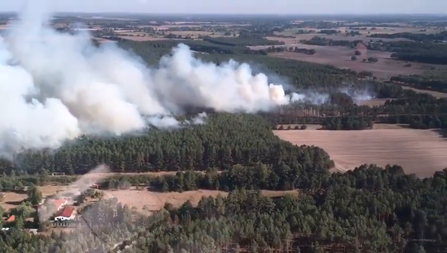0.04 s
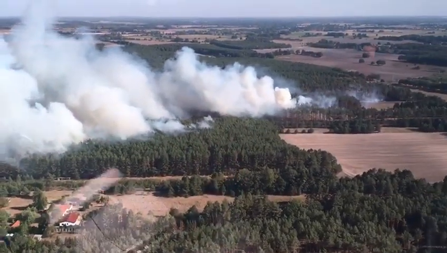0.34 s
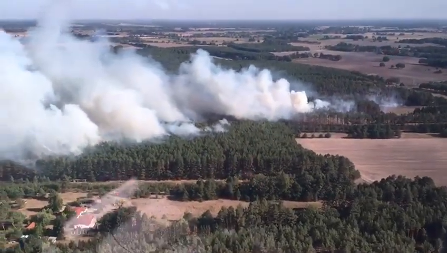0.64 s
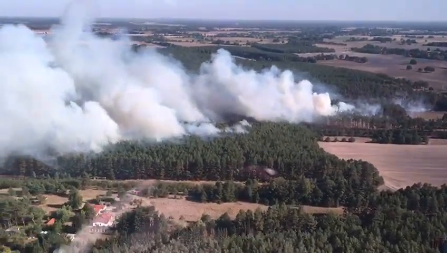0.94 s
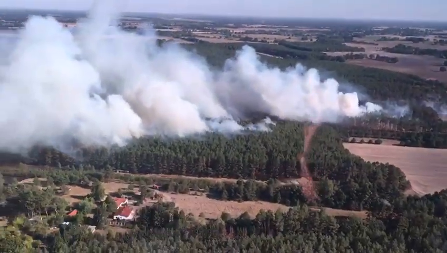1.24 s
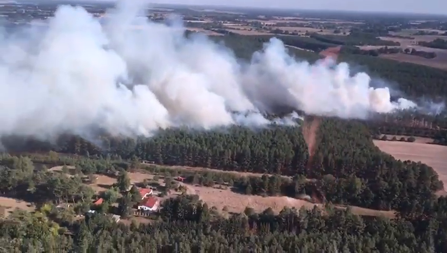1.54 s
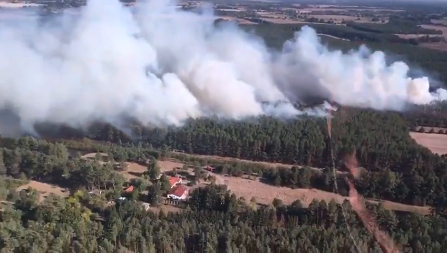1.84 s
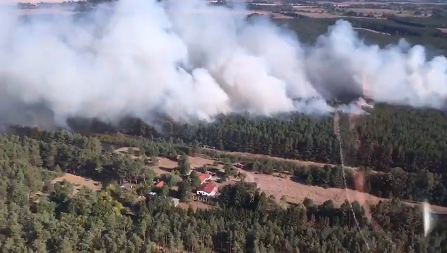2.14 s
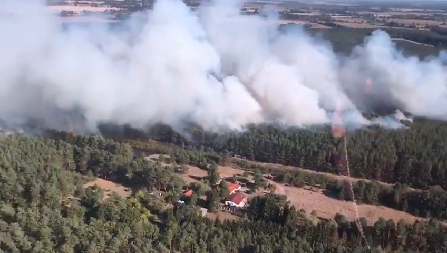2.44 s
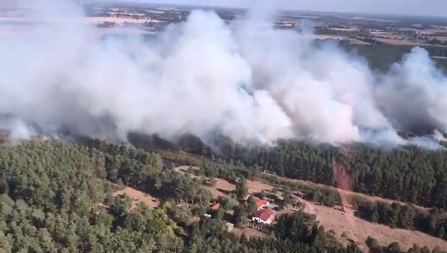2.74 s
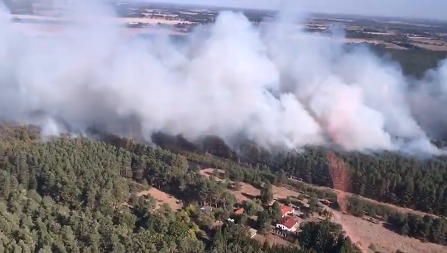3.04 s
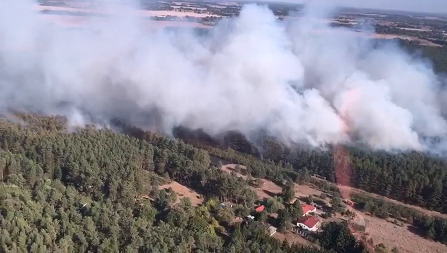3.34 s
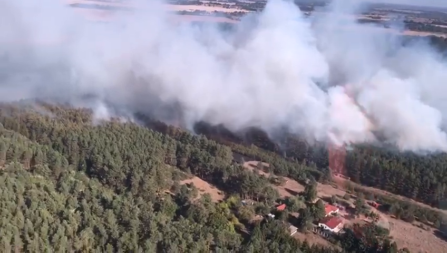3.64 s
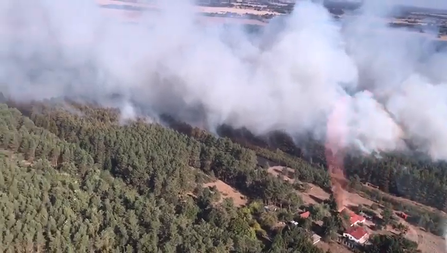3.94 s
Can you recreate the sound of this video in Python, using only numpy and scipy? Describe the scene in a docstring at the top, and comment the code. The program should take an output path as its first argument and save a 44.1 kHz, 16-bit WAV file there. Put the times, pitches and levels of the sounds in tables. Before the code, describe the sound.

A helicopter in steady flight, heard from inside, with throbbing rotor and whining gears.

```python
"""Inside the cabin of a helicopter in steady flight.
The main rotor throbs 26 times a second, one pulse for each passing blade, and its overtones
swell and fade. Meshing gear teeth whine, and a turbine whistles high up and rises a little.
Behind them, air buffets the cabin with a low rumble and rushes along the hull."""
import sys
import numpy as np
from scipy import signal
from scipy.fft import rfft, irfft
from scipy.io import wavfile

SR = 44100
rng = np.random.default_rng(int(sys.argv[2]) if len(sys.argv) > 2 else 0)


def transcribe(signal):
    """Save signal, clipped to [-1, 1], as a 16-bit WAV file at the path in sys.argv[1]."""
    frames = np.atleast_2d(signal).T
    limited = np.clip(frames, -1, 1)
    pcm = np.round(limited * 32767).astype(np.int16)
    wavfile.write(sys.argv[1], SR, pcm)


N = 176400
TIME = np.arange(N) / SR
BLADES, BLADE_PASS_HZ, FIRST_BLADE_S = 4, 25.94, .021

# Strong rotor overtones, at 2, 3, 4 and 6 times the blade rate: t/s, level/dB
ROTOR_2_LEVEL = [(0, -27), (.42, -20.5), (.63, -40), (.85, -18), (1, -25.5), (1.5, -27.5), (2.1, -22.5),
                 (2.35, -19), (2.65, -16), (2.88, -41), (3.05, -18.5), (3.6, -29), (4, -17)]
ROTOR_3_LEVEL = [(0, -17), (.3, -16), (.43, -21.5), (.55, -14.5), (.95, -17.5), (1.351, -18.5),
                 (1.65, -15.5), (2.45, -24), (2.6, -23.5), (3.1, -19.5), (3.6, -23), (4, -27.5)]
ROTOR_4_LEVEL = [(0, -27), (.2, -28), (.3, -18), (.42, -11), (.53, -19), (0.628, -44), (.75, -14),
                 (.88, -14), (1.2, -20), (1.34, -41), (1.46, -15), (1.6, -15.5), (2.25, -22.5), (2.42, -24),
                 (2.68, -14.5), (3.6, -18), (4, -13.5)]
ROTOR_6_LEVEL = [(0, -27.5), (1, -25), (1.1, -40), (1.35, -32.5), (1.5, -23.5), (1.97, -19), (2.05, -40),
                 (2.23, -24.5), (2.33, -37.5), (2.44, -24.5), (2.6, -23), (2.73, -29.5), (3.03, -22.5),
                 (3.27, -28), (3.47, -24), (3.7, -21), (3.8, -27), (4, -18.5)]
# Weaker rotor tones: multiple of the blade rate, level/dB, random swing/dB
WEAK_ROTOR_TONES = [(1, -28.5, 0), (5, -28.5, -0.5), (7, -32, 2), (8, -34.5, 1.5), (9, -36.5, 2.5),
                    (10, -43, 4.5), (11, -47.5, -1), (14, -47.5, 2.5), (16, -56, -3.5), (19, -47, 0.5)]

# Pitch of the main gear whine, made by teeth meshing: t/s, f/Hz
MESH_PITCH = [(0, 1930), (.6, 1930), (1.4, 1917), (2.2, 1918), (2.8, 1925), (4, 1920)]
# Loudness of that whine: t/s, level/dB
MESH_LEVEL = [(0, -30.5), (.035, -48), (.075, -28.5), (.19, -36.5), (.27, -28.5), (.345, -36), (.435, -29),
              (.5, -35.5), (.58, -28), (.64, -34.5), (.68, -44), (.715, -28.5), (.76, -37), (.9, -30.5),
              (.98, -37.5), (1.08, -32.5), (1.2, -33), (1.53, -32), (1.95, -41.5), (2.1, -33),
              (2.35, -35.5), (2.7, -44.5), (3.2, -40.5), (3.6, -36.5), (4, -37.5)]
# Rough noise around that whine, relative to it: t/s, level/dB
MESH_ROUGHNESS = [(0, -5), (.7, -5), (1.1, -11), (1.6, -12), (2.3, -8), (2.8, 0), (3.4, -2), (4, -5)]
# The tone an octave above that whine: t/s, level/dB
OCTAVE_LEVEL = [(0, -52), (.4, -51.5), (1.2, -55), (1.8, -59), (2.4, -55), (3.2, -48.5), (4, -61)]
# Other strong gear tones: f/Hz, then rows of t/s, level/dB
GEAR_TONES = [(661, [(0, -45), (.5, -45), (1.1, -44), (1.6, -55), (3.3, -50), (3.75, -40), (4, -48)]),
              (758, [(0, -36.5), (.9, -37.5), (1.4, -45), (2, -68), (4, -61)]), (1518, [(0, -41.5),
              (.75, -42.5), (1.05, -54), (4, -48)]), (1651, [(0, -43), (1.5, -47), (2.2, -49), (4, -44)]),
              (2273, [(0, -42), (.7, -53), (1.2, -57), (4, -55)]), (2569, [(0, -41.5), (.9, -42.5),
              (1.1, -46.5), (1.35, -57), (2.15, -59), (2.5, -45.5), (4, -43)])]
# Weak gear and tail rotor tones: f/Hz, starting level/dB, final level/dB
WEAK_TONES = [(824, -49, -46), (948, -49, -51), (970, -51, -54), (1050, -51, -46), (1260, -51, -58),
              (1322, -50, -55), (1625, -52, -54), (2474, -55, -54), (3027, -59, -58)]

# Pitch of the whistle from the turbine's compressor: t/s, f/Hz
WHISTLE_PITCH = [(0, 9885), (.7, 9925), (1.25, 9965), (1.55, 10025), (1.8, 10090), (2.35, 10150),
                 (3.5, 10160), (4, 10215)]
# Loudness of that whistle: t/s, level/dB
WHISTLE_LEVEL = [(0, -44.5), (.5, -45.5), (.72, -42), (.87, -46.5), (1.3, -51), (1.58, -41), (1.73, -50),
                 (1.9, -44.5), (2.15, -53), (2.42, -44.5), (2.6, -44), (2.8, -51), (3.25, -44), (4, -45)]
# Tone colour of the turbine's hiss: f/Hz, relative level/dB
HISS_COLOUR = [(2500, -6.5), (4300, 1.5), (4650, 0), (4950, -4.5), (5500, 4.5), (5950, 3.5), (6600, 1),
               (7600, -0.5), (8600, 3), (9500, 4.5), (10250, 2.5), (10420, -1), (11700, -13)]
# Loudness of the hiss: t/s, level/dB
HISS_LEVEL = [(0, -42), (.45, -40.5), (1.2, -44.5), (1.8, -44), (2.6, -40), (4, -42)]
# Breathy turbine whines: f/Hz, width/Hz, level/dB relative to the hiss
TURBINE_WHINES = [(3155, 50, -20), (3770, 70, -20), (5762, 20, -19), (5840, 60, -14.5), (6125, 90, -14.5),
                  (6575, 70, -21)]

# Tone colour of the air buffeting the cabin: f/Hz, relative level/dB
RUMBLE_COLOUR = [(12, -24), (26, -25), (39, -7), (58, -3.5), (90, -0.5), (125, -2), (175, -1.5),
                 (225, -7.5), (290, -15), (420, -24), (800, -44)]
# Loudness of the buffeting: t/s, level/dB
RUMBLE_LEVEL = [(0, -23), (.45, -17.5), (.9, -19), (1.3, -24.5), (1.9, -21.5), (2.3, -21.5), (2.8, -23.5),
                (3.3, -23.5), (4, -21)]
# Tone colour of the rush of air and machinery: f/Hz, relative level/dB
RUSH_COLOUR = [(150, -0.5), (330, 3), (440, -1.5), (540, -.5), (690, -5.5), (830, -1), (1020, -11.5),
               (1130, -6.5), (1280, -5), (1460, -8.5), (1750, -7), (2020, -3), (2170, -8), (2550, -7),
               (2830, -13), (3400, -15), (3800, -18.5), (4100, -21), (5000, -25.5)]
# Loudness of the rush: t/s, level/dB
RUSH_LEVEL = [(0, -27.5), (.25, -28.5), (.45, -29), (.7, -30), (1.1, -30.5), (2, -29.5), (2.6, -28.5),
              (3.1, -29), (3.6, -28), (4, -27.5)]
# Tone colour of an early, mid-pitched swell in the rush: f/Hz, relative level/dB
SWELL_COLOUR = [(230, 2.5), (400, 0), (570, 2), (700, -6), (960, 0), (1100, -5), (1350, -6.5), (1750, -11),
                (2300, -17.5), (2780, -4.5), (3100, -17.5)]
# Loudness of the swell: t/s, level/dB
SWELL_LEVEL = [(0, -36), (.15, -31), (.3, -33), (.38, -25.5), (.47, -32.5), (.7, -33), (1.1, -41),
               (1.6, -48), (4, -58)]


def rotor():
    """Each blade sends a suction pulse; rough air shakes its overtones out of step, high ones most."""
    strong = (2, ROTOR_2_LEVEL), (3, ROTOR_3_LEVEL), (4, ROTOR_4_LEVEL), (6, ROTOR_6_LEVEL)
    gains = [(multiple, gain_curve(rows)) for multiple, rows in strong]
    gains += [(multiple, from_db(db + swing * drift(2.9))) for multiple, db, swing in WEAK_ROTOR_TONES]
    pulses = np.zeros(N)
    for multiple, gain in gains:
        angle = blade_angle() + .19 * drift(rate_hz=.7)
        pulses -= gain * np.cos(multiple * angle)  # minus, because suction lowers the pressure
    return np.sqrt(2) * pulses


def gearbox():
    """Meshing teeth make a rough whine and its octave, among other wavering tones."""
    jitter_hz, swing_db = 2, 2
    hz = curve(MESH_PITCH) + jitter_hz * drift(2.93)
    mesh = tone(hz) * from_db(.5 * drift(22))
    mesh += gain_curve(MESH_ROUGHNESS) * noise_band(hz, width_hz=85)
    octave = tone(2 * hz) + from_db(1) * noise_band(2 * hz, width_hz=110)
    levels = [(pitch_hz, curve(rows)) for pitch_hz, rows in GEAR_TONES]
    levels += [(pitch_hz, np.linspace(start_db, end_db, N)) for pitch_hz, start_db, end_db in WEAK_TONES]
    others = sum(from_db(db + swing_db * drift(12)) * tone(pitch_hz + jitter_hz * drift(5.6))
                 for pitch_hz, db in levels)
    others *= 1 + .22 * drift(14)  # a fine shake that these tones share
    return gain_curve(MESH_LEVEL) * mesh + gain_curve(OCTAVE_LEVEL) * octave + others


def turbine():
    """The compressor's rough whistle climbs in a band of noise, over broad hiss and breathy whines."""
    hz = curve(WHISTLE_PITCH)
    whistle = gain_curve(WHISTLE_LEVEL) * noise_band(hz, width_hz=51)
    breath = from_db(-49) * noise_band(hz, width_hz=280, order=4)
    whines = sum(from_db(db) * noise_band(np.full(N, pitch_hz), width_hz)
                 for pitch_hz, width_hz, db in TURBINE_WHINES)
    return whistle + breath + gain_curve(HISS_LEVEL) * (noise(HISS_COLOUR) + whines)


def buffeting():
    """Air buffets the cabin, making a low rumble that pulses with the blades."""
    return gain_curve(RUMBLE_LEVEL) * throb(depth=.16) * noise(RUMBLE_COLOUR)


def air_rush():
    """Air rushes along the hull, swelling early on and pulsing gently with the blades."""
    rush = gain_curve(RUSH_LEVEL) * noise(RUSH_COLOUR)
    swell = gain_curve(SWELL_LEVEL) * noise(SWELL_COLOUR)
    flicker = from_db(.5 * drift(8.3))
    sway = 1 + .012 * np.cos(blade_angle() / BLADES)  # once for each full turn of the rotor
    return (rush + swell) * flicker * throb(depth=.038) * sway


def blade_angle():
    """An angle in radians that goes round once with each passing blade."""
    return 2 * np.pi * BLADE_PASS_HZ * (TIME - FIRST_BLADE_S)


def throb(depth):
    """A gain that rises and falls with each passing blade."""
    return 1 + depth * np.cos(blade_angle())


def from_db(db):
    """Turn decibels into a gain, the number a sound is multiplied by."""
    return 10 ** (np.asarray(db) / 20)


def rms_one(x):
    """Scale a signal so that its average strength (rms) is 1."""
    return x / np.sqrt(np.mean(x ** 2) + 1e-20)


def curve(rows):
    """Join (time, value) points with straight lines, giving a value for every sample."""
    return np.interp(TIME, *np.transpose(rows))


def gain_curve(rows):
    """Turn (time, decibels) points into a gain for every sample."""
    return from_db(curve(rows))


def drift(rate_hz):
    """A smooth random wobble around 0, about 1 in size; a higher rate wobbles faster."""
    step, warm_up = 40, 2000  # one random value every 40 samples; the first 2000 let the filter settle
    pole = np.exp(-2 * np.pi * rate_hz * step / SR)
    draws = rng.standard_normal(N // step + warm_up + 2)
    slow = signal.lfilter([1], [1, -2 * pole, pole * pole], draws)[warm_up:]
    return np.interp(np.arange(N) / step, np.arange(len(slow)), rms_one(slow - slow.mean()))


def tone(hz):
    """A pure tone of strength 1 that follows a moving pitch."""
    return np.sqrt(2) * np.sin(2 * np.pi * (np.cumsum(hz) / SR + rng.random()))


def noise_band(hz, width_hz, order=2):
    """A narrow band of noise around a moving pitch, like a breathy whistle."""
    lowpass = signal.butter(order, width_hz / 2, fs=SR, output="sos")
    slow_a, slow_b = signal.sosfilt(lowpass, rng.standard_normal((2, N)))
    angle = 2 * np.pi * np.cumsum(hz) / SR
    return rms_one(slow_a * np.cos(angle) + slow_b * np.sin(angle))


def noise(colour):
    """Noise of strength 1 with the given tone colour, fading below and above the table's range."""
    hz, db = np.transpose(colour)
    f = np.maximum(np.arange(N // 2 + 1) * SR / N, 1)
    edge_fade = np.minimum(f / hz[0], 1) ** 2 * np.minimum(hz[-1] / f, 1) ** 2
    shape = from_db(np.interp(np.log(f), np.log(hz), db))
    return rms_one(irfft(rfft(rng.standard_normal(N)) * edge_fade * shape, N))


def scene():
    """Everything heard in the cabin, in one channel."""
    return (rotor() + gearbox() + turbine() + buffeting() + air_rush())[None]


def record(dry):
    """Round off the tallest peaks, then cut away the highest treble."""
    knee, headroom, cutoff_hz = .7, .2, 11700
    excess = np.maximum(np.abs(dry) - knee, 0)
    rounded = dry - np.sign(dry) * (excess - headroom * np.tanh(excess / headroom))
    return signal.sosfilt(signal.ellip(10, .1, 90, cutoff_hz, fs=SR, output="sos"), rounded)


dry = scene()
out = record(dry)
transcribe(out)
```